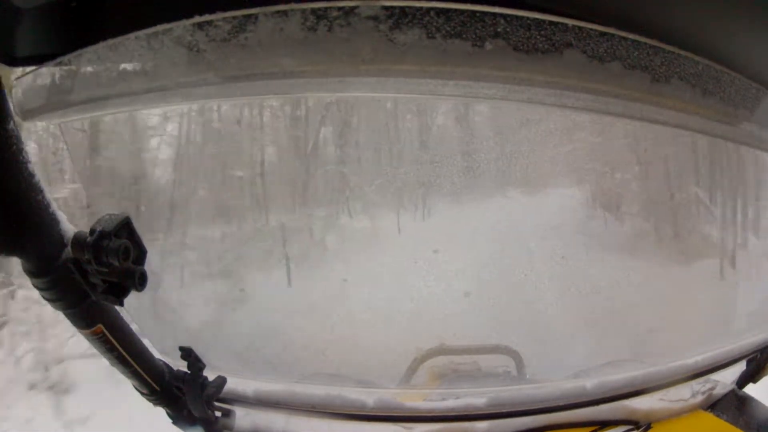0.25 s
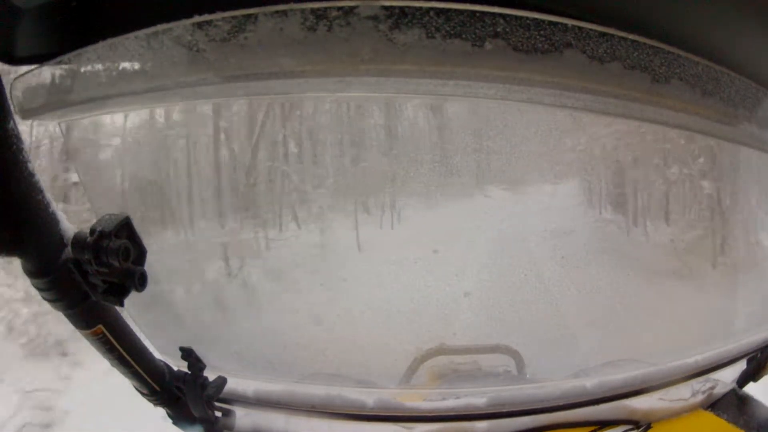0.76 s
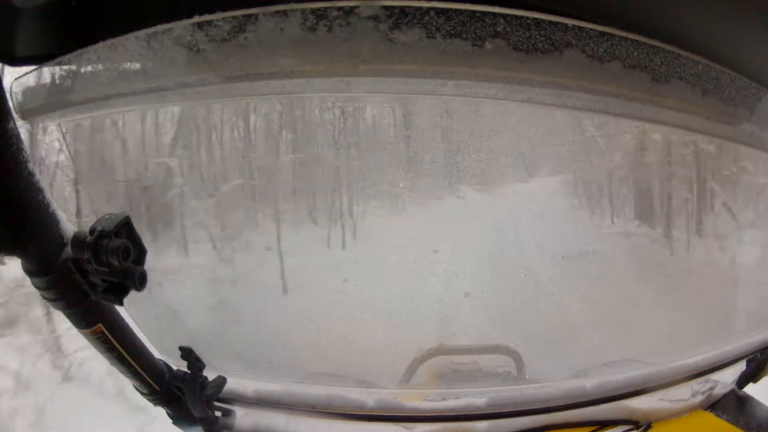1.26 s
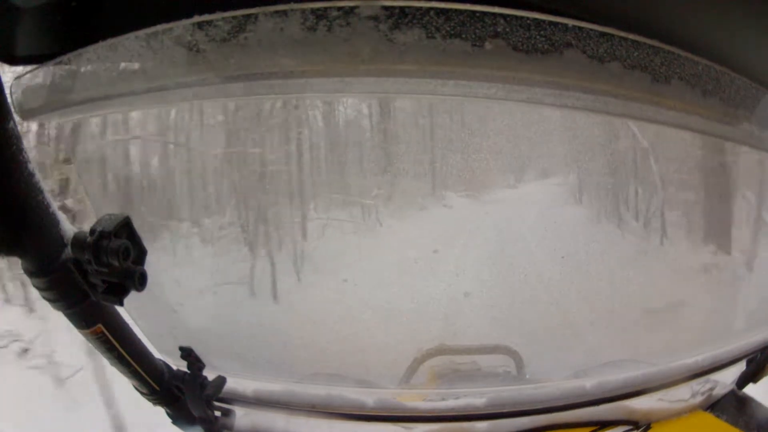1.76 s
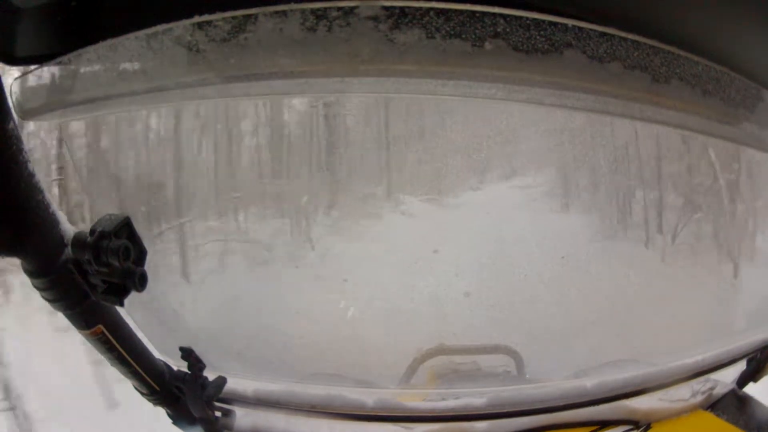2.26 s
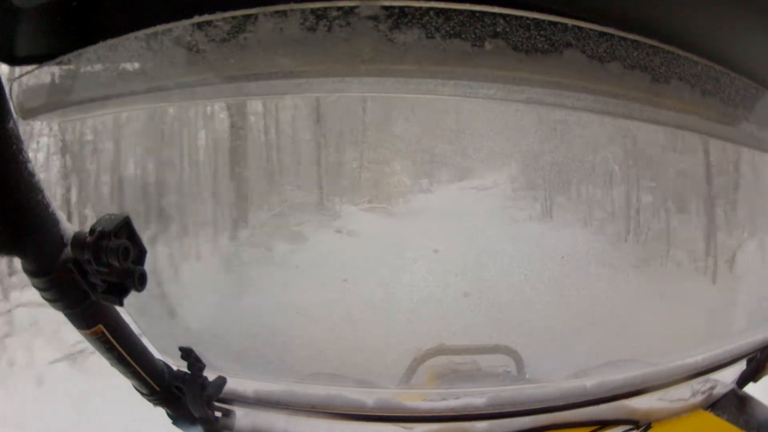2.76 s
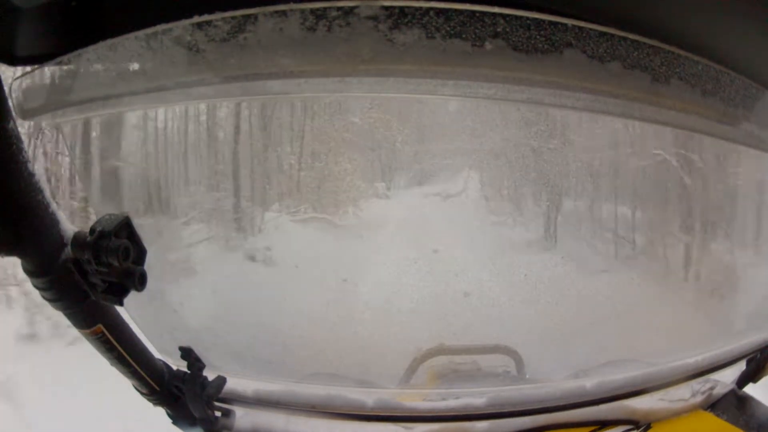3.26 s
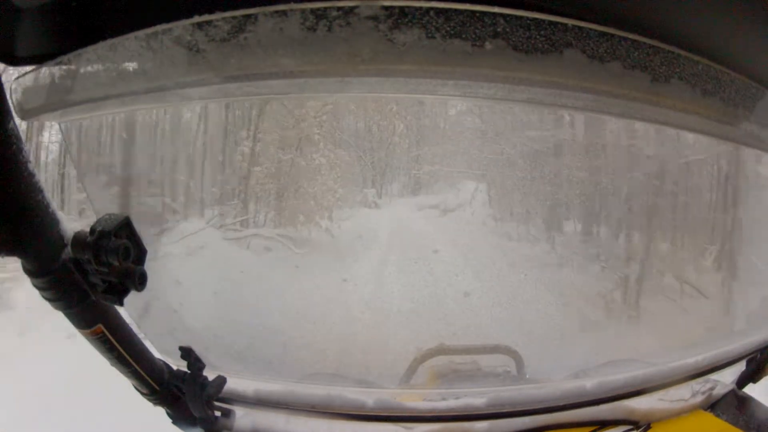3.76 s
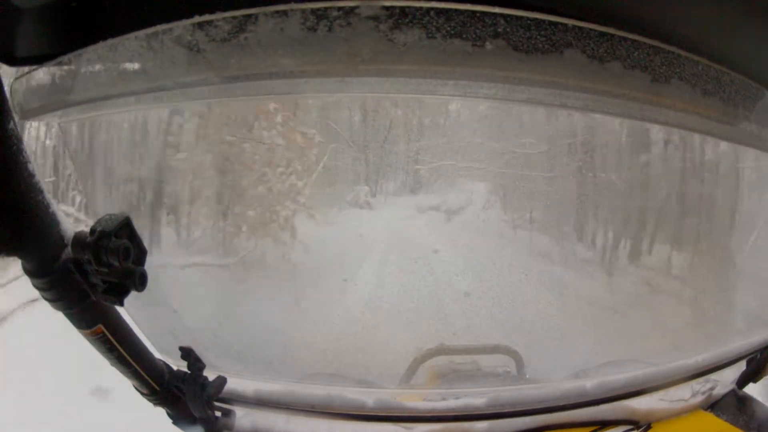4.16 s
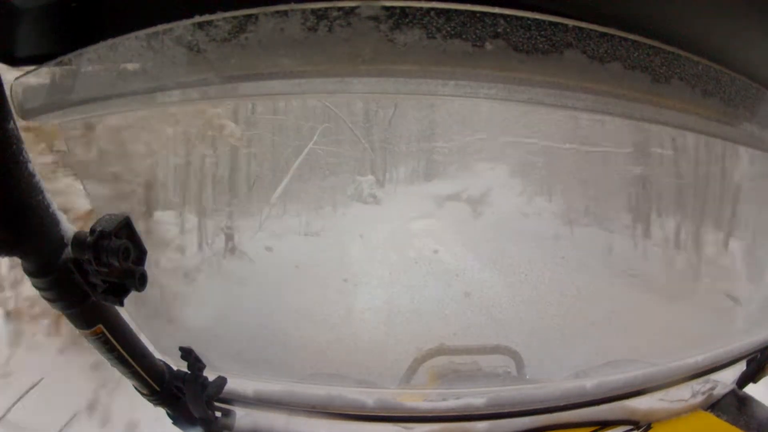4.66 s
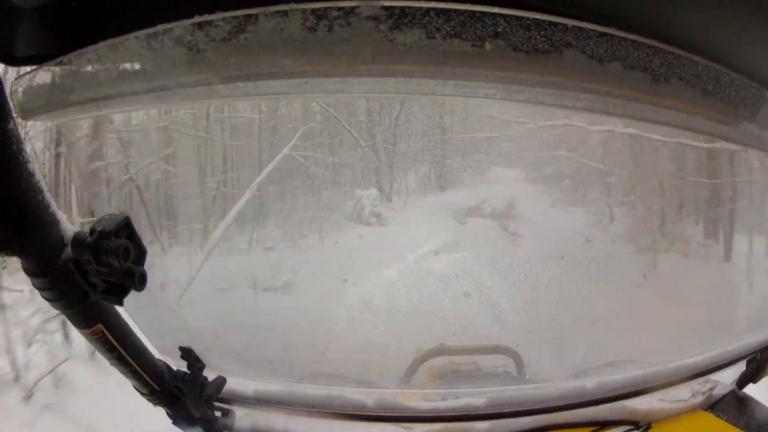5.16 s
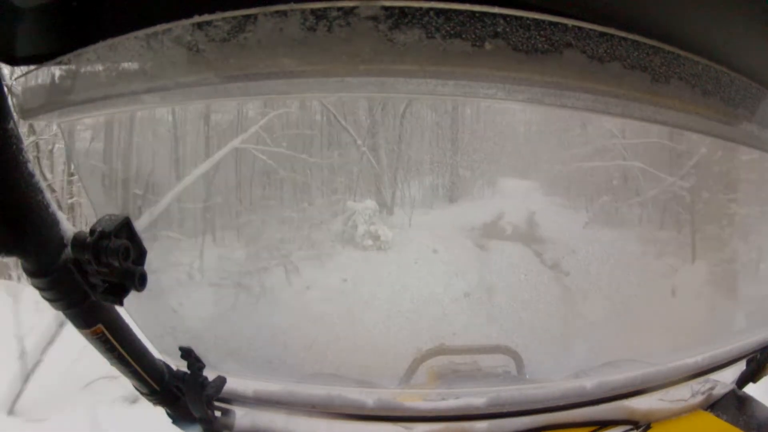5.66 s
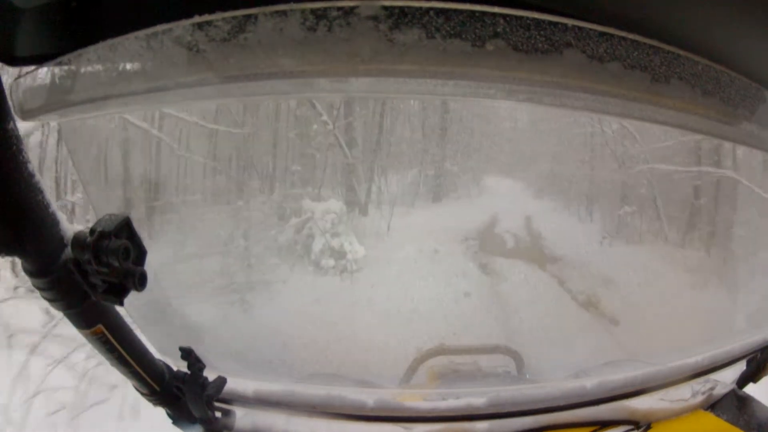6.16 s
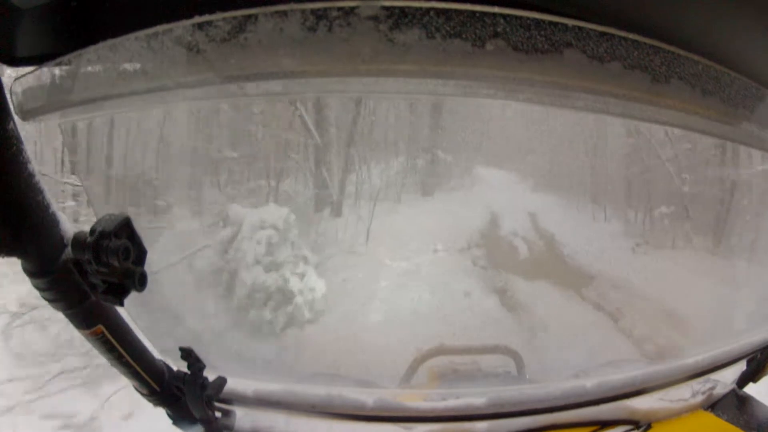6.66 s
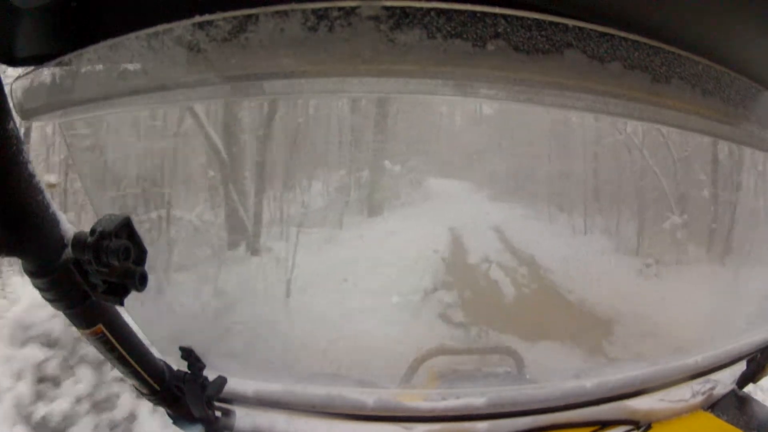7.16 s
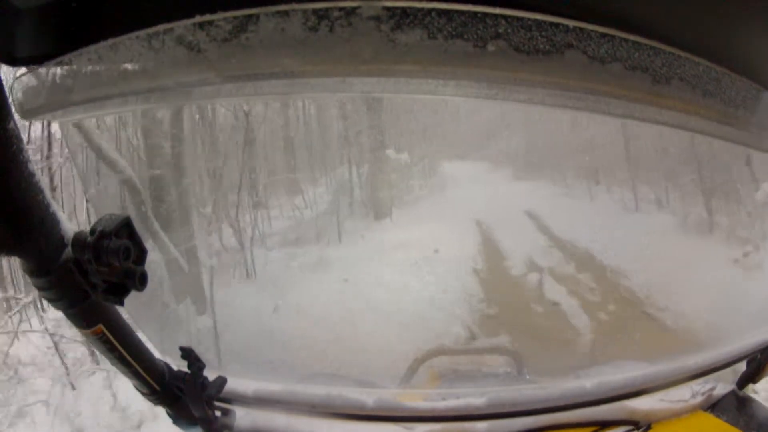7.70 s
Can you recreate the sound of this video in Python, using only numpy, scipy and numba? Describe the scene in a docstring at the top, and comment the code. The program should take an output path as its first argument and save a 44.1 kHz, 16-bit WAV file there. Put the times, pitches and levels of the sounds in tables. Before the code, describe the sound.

An off-road vehicle's engine pulls and then drops to a low boom, with tyre rumble, sharp body knocks and a rattling panel.

```python
"""A twin engine, heard in the cab of a side-by-side on a snowy trail. It pulls, then drops back
until its firing rate meets the cab's boom resonance and shakes a loose panel. Tyres hum and
rumble, snow sprays the underside, the drive belt hisses near top speed and the body knocks
over bumps. A limiter ducks after each hard knock."""
import sys
import numpy as np
from scipy import signal
from scipy.fft import rfft, irfft
from scipy.io import wavfile
from scipy.ndimage import uniform_filter1d, minimum_filter1d, map_coordinates
from numba import njit

SR = 44100
rng = np.random.default_rng(int(sys.argv[2]) if len(sys.argv) > 2 else 0)


def int16_out(signal):
    """Quantize to a 16-bit WAV file."""
    q = np.round(np.clip(np.atleast_2d(signal).T, -1, 1) * 32767)
    wavfile.write(sys.argv[1], SR, q.astype(np.int16))


N = 349713
T = np.arange(N) / SR

# Levels in all tables are relative.
# Road speed. Each row: time in seconds, tyre lug strike rate in Hz.
LUG_RATE_HZ = [(0, 85.2), (.6, 84), (.85, 87.5), (1.08, 86.9), (1.22, 91.8), (1.53, 92.3), (1.8, 96.8),
               (2.07, 94.8), (2.35, 100.7), (2.62, 98.6), (2.95, 102.5), (3.1, 105.8), (3.25, 104.4),
               (3.4, 108), (3.75, 111.8), (3.92, 110.7), (4.2, 113), (4.4, 111.5), (4.72, 100.5),
               (4.88, 98.5), (5.05, 93.3), (5.45, 87.5), (5.6, 82.5), (6.3, 76), (6.7, 71), (7.93, 63)]
# Cab response to the lug harmonics. Each row: frequency in Hz, gain in dB.
LUG_RESPONSE_DB = [(150, -24), (200, -15), (230, -23), (250, -15), (275, 0), (300, 1), (335, -3), (355, -8),
                   (378, -6), (410, -15), (450, -19), (500, -19.5), (565, -23.5), (640, -38)]
# Tyre hum, swelling where the lugs bite. Each row: time in seconds, level in dB.
HUM_LEVEL_DB = [(0, -19), (.6, -15), (1.05, -21.5), (1.22, -15.5), (1.9, -13), (2.4, -16.5), (2.7, -21.5),
                (3.2, -14), (3.9, -14), (4.3, -19), (4.55, -19.5), (4.85, -23.5), (5.03, -15.5), (5.2, -33),
                (5.38, -30), (5.6, -8), (5.9, -39), (6.4, -26), (7.93, -25.5)]
# Tyre and chassis rumble. Each row: frequency in Hz, spectral density in dB.
RUMBLE_SPECTRUM_DB = [(15, -36), (35, -19), (51, 1.5), (65, -15), (110, -21), (150, -23), (185, -16),
                      (240, -21), (305, -5), (335, -6), (370, -13), (420, -25), (540, -28), (650, -34),
                      (2000, -60)]
# Snow spray. Each row: time in seconds, level in dB.
SPRAY_LEVEL_DB = [(2.48, -75), (2.55, -40), (2.9, -38), (3.05, -65), (4.3, -48), (4.55, -32), (4.75, -59),
                  (5.05, -61), (5.11, -28.5), (5.35, -46), (5.7, -29.5), (5.95, -26.5), (6.3, -69),
                  (6.65, -54), (6.78, -41), (6.9, -62)]
# Underside rung by snow. Each row: frequency in Hz, spectral density in dB.
SPRAY_SPECTRUM_DB = [(1200, -11.5), (1700, 4), (2000, 9.5), (2300, 0.5), (2750, -13), (3400, 0),
                     (4000, -21), (4450, 0), (4800, -26), (5100, -4.5), (6000, -31)]
# Belt hiss. Each row: start and end in seconds, centre and resonator width in Hz, level in dB.
BELT_HISS_BANDS = [(3.05, 4.33, 2130, 200, -34), (3.05, 3.47, 4350, 380, -49), (3.05, 3.47, 5050, 400, -47),
                   (3.47, 4.3, 3300, 1000, -40), (3.47, 4.3, 3890, 280, -43), (3.47, 4.3, 4400, 450, -51),
                   (3.47, 4.3, 5050, 400, -52)]
# Wheel thuds. Each row: start in seconds, level in dB.
WHEEL_THUDS = [(1.548, -7), (1.825, -11), (1.968, -9)]
# Hard knocks. Each row: start in seconds, ring and crack levels in dB, note in Hz,
# contact half-width in seconds.
HARD_KNOCKS = [(.22, -8.5, -24, 1945, 0.0031), (.312, -16, -33, 1750, 0.02),
               (.452, -12.5, -28, 1820, 0.017), (.625, 5, -5.5, 1660, 0.0011), (.77, -11, -24, 2000, 0.012),
               (.854, -9.5, -28, 1780, 0.0074), (1.122, -13, -27, 1760, 0.018),
               (2.119, -12, -33, 1700, 0.049), (2.534, -11, -20.5, 2000, 0.035),
               (2.619, -7.5, -13, 1660, 0.0046), (2.685, -14.5, -34, 1950, 0.011),
               (2.742, -16, -21.5, 2000, 0.034), (2.783, -12, -19.5, 1960, 0.025),
               (3.5134, -2, 4.5, 1850, 0.0022), (4.1, 2, -10, 1840, 0.0017),
               (4.293, 1.5, -14, 1670, 0.0011), (4.373, -13, -17, 1840, 0.017),
               (4.388, -13, -16.5, 1820, 0.015), (4.402, -18, -18, 1770, 0.016),
               (4.455, 6.5, -3, 1810, 0.0013), (4.533, -9, -14.5, 2080, 0.014),
               (4.622, -16, -18, 1860, 0.015), (4.688, -19, -27, 1770, 0.0013),
               (4.701, 7, -28, 1735, 0.0013), (4.847, 6.5, -23.5, 1864, 0.0021),
               (4.939, -2.5, -15, 2150, 0.011), (4.953, -5, -20, 1850, 0.0059),
               (5.085, 2.5, -6.5, 1790, 0.0048), (5.233, -12.5, -18, 1800, 0.022),
               (5.303, -10, -29, 1840, .007), (5.626, 1, -7, 1530, 0.0062), (5.714, -3, -12, 1950, .007),
               (5.785, -9.5, -30, 1880, 0.021), (5.826, -13, 8.5, 2160, 0.0012),
               (5.854, -24, -1.5, 2200, 0.0039), (5.873, -24, -10.5, 2200, .01),
               (6.76, -12, -25, 1560, .008), (6.8, -9.5, -33, 1860, 0.0048), (7.135, -5, -13, 1800, 0.0051),
               (7.168, -12, -22, 1860, 0.0035), (7.188, -11, -29, 1870, 0.0085),
               (7.208, 1.5, -15, 1860, .003), (7.228, -11, -26, 1800, .005),
               (7.265, -3.5, -19, 1810, 0.002), (7.427, -2.5, -15.5, 1830, 0.0016)]
# Body panel response. Each row: frequency in Hz, gain in dB.
BODY_RESPONSE_DB = [(300, -39), (900, -14.5), (1350, -5), (1600, -2), (1830, 0), (2150, -8), (2700, -55),
                    (3500, -15), (4300, -70), (6000, -49)]
# Body panel modes. Each row: frequency in Hz, width in Hz, gain in dB.
BODY_MODES = [(1789, 42, 7.5), (1883, 23.5, 9.5), (2003, 24, 5)]
# Crack of hard contact. Each row: frequency in Hz, spectral density in dB.
CRACK_SPECTRUM_DB = [(300, -2.5), (900, -16.5), (1700, -6.5), (2250, 1.5), (2750, -8.5), (3500, 2.5),
                     (4000, -14), (4450, -5), (4850, -14.5), (5300, -14.5), (6500, -17)]
# Loose panel buzz. Each row: time in seconds, tap level in dB.
BUZZ_LEVEL_DB = [(5.2, -41), (5.9, -49), (6.15, -17.5), (6.45, -19), (6.7, -24), (7.03, -22), (7.25, -16),
                 (7.5, -14.5), (7.93, -19)]
# Loose panel's hardest slaps. Each row: start in seconds, level in dB.
PANEL_SLAPS = [(6.304, -14.5), (6.325, -11.5), (6.405, -18), (6.443, -16), (6.462, -21), (6.483, -24),
               (6.5639, -6.5), (6.9576, -11), (7.369, -7.5), (7.392, -13), (7.5095, -6), (7.5691, -12),
               (7.629, -10), (7.652, -5.5), (7.712, -9.5), (7.7496, -11.5), (7.772, -3), (7.829, -6),
               (7.85, -3), (7.867, -7), (7.887, -6.5)]
# Loose panel edge. Each row: frequency in Hz, spectral density in dB.
EDGE_SPECTRUM_DB = [(400, -45), (1200, -17), (1800, 10), (2600, -10), (3400, -3), (4300, -17.5),
                    (6000, -24)]
# Engine speed. Each row: time in seconds, four-stroke cycle rate in Hz (two firings a cycle).
CYCLE_RATE_HZ = [(0, 30.55), (.6, 30.6), (.85, 32.6), (1.05, 33.1), (1.2, 34.9), (1.85, 35.85),
                 (2.05, 35.3), (2.7, 35.9), (3.45, 37.85), (3.9, 37.05), (4.42, 35.7), (4.64, 30),
                 (4.9, 29.4), (5.3, 27.2), (5.45, 27.7), (5.7, 25.4), (6.3, 24.85), (6.95, 25.7),
                 (7.6, 24.9), (7.93, 25.45)]
# Engine load. Each row: time in seconds, exhaust level in dB, clatter level in dB.
LOAD_LEVELS_DB = [(0, -20, -32), (.8, -19.5, -28.5), (1.35, -13.5, -27.5), (2.1, -19.5, -31),
                  (2.35, -12.5, -28), (2.65, -18.5, -30), (3.35, -14, -25), (3.7, -16.5, -26.5),
                  (4.3, -18.5, -28.5), (4.55, -28, -34.5), (4.75, -17.5, -32), (5, -14.5, -28),
                  (5.38, -25, -38.5), (5.6, -18.5, -25), (5.9, -32, -42), (6.4, -23.5, -34),
                  (7.93, -21.5, -37)]
# Engine casing and belt housing. Each row: frequency in Hz, spectral density in dB.
CASING_SPECTRUM_DB = [(400, -2.5), (650, -7), (900, -33), (1060, 9), (1350, -2.5), (1750, 4.5),
                      (2150, -2.5), (2700, -38.5), (3300, -9.5), (3650, -19), (4050, -34.5), (4450, -23),
                      (4750, -45), (5100, -24), (6000, -57.5)]
# Casing modes. Each row: frequency in Hz, width in Hz, gain in dB.
CASING_RESONANCES = [(807.4, 39, -1), (1006.2, 15.4, 11.5), (2353, 44, -11)]
# Exhaust harmonics. Each row: multiple of the cycle rate, level in dB.
EXHAUST_ORDERS = [(1, 2.5), (3, 2.5), (4, 3.5), (5, -3), (6, -0.5), (7, -6.5), (8, -2.5), (9, -1.5),
                  (10, -4), (11, -7), (12, -1)]
# Cab response to the exhaust. Each row: frequency in Hz, gain in dB.
CAB_RESPONSE_DB = [(25, -17), (36, -7), (85, -8), (110, -3), (130, 0.5), (140, -12), (150, -13), (178, -3),
                   (205, -9), (240, -11), (285, 2), (308, -2), (336, 3), (385, -5), (412, -13), (490, -19),
                   (570, -24), (700, -38)]
# Firing boom, loudest at the cab's resonance. Each row: time in seconds, level in dB.
BOOM_LEVEL_DB = [(0, -17.5), (.8, -24), (1.6, -26.5), (2.4, -24.5), (4.3, -22.5), (4.62, -27),
                 (4.69, -14.5), (4.76, -21), (5.17, -21), (5.26, -12.5), (5.39, -16), (5.5, -10),
                 (5.72, -12.5), (5.93, -20.5), (6.12, -10.5), (7.93, -12.5)]


def undb(db):
    """Decibels to gain."""
    return 10 ** (np.asarray(db) / 20)


def unit(x):
    """Scale to an rms of 1."""
    return x / np.sqrt(np.mean(x ** 2))


def curves(table):
    """Each value column interpolated over time."""
    times_s, *columns = np.transpose(table)
    return [np.interp(T, times_s, column) for column in columns]


def gain_at(hz, spectrum):
    """Gain of a (Hz, dB) spectrum, falling steeply past its top end."""
    points_hz, db = np.transpose(spectrum)
    return undb(np.interp(np.log(hz + 1), np.log(points_hz), db)) / (1 + (hz / points_hz[-1] / 2) ** 6)


def colour(x, spectrum, size=16384):
    """Minimum-phase filter with the given spectrum."""
    cepstrum = irfft(np.log(gain_at(np.arange(size // 2 + 1) * SR / size, spectrum)))
    cepstrum[1:size // 2] *= 2
    cepstrum[size // 2 + 1:] = 0
    return signal.fftconvolve(x, irfft(np.exp(rfft(cepstrum))))[:len(x)]


def ring(x, hz, width_hz):
    """One resonance."""
    return signal.lfilter(*signal.iirpeak(hz, hz / width_hz, fs=SR), x)


def muffle(x, hz):
    """Steep low-pass."""
    return signal.sosfilt(signal.butter(6, hz, fs=SR, output="sos"), x)


def walk(rate_hz):
    """Smooth random curve, spread near 1."""
    return 1.2 * map_coordinates(rng.standard_normal(4096), [T * rate_hz], order=2, mode="wrap")


def noise():
    """White noise."""
    return rng.standard_normal(N)


def add(track, start_s, sound):
    """Mix a sound into a track."""
    part = track[int(start_s * SR):][:len(sound)]
    part += sound[:len(part)]


def tyre_tone(lug_hz, order):
    """One multiple of the lug rate; unequal wheel speeds make it swell and wander."""
    lug_cycles = np.cumsum(lug_hz) / SR
    phase = 2 * np.pi * (order * lug_cycles + rng.random()) + .2 * walk(10)
    swell = 1 + .18 * walk(14) + .08 * walk(80)
    return gain_at(order * lug_hz, LUG_RESPONSE_DB) * np.sin(phase) * swell


def tyres(hum_db=2.5, rumble_db=-23, sway_db=2.5):
    """Lugs drum a hum and a drive gear sings; gear and chassis rumble fade as the vehicle slows."""
    lug_hz, = curves(LUG_RATE_HZ)
    slowing = np.interp(T, [4.6, 5.7], [0, 1])
    hum = sum(tyre_tone(lug_hz, order) for order in (2, 3, 4, 5))
    gear = tyre_tone(lug_hz, order=3.7) * undb(-.5 - 9 * slowing)
    rumble = unit(colour(noise(), RUMBLE_SPECTRUM_DB))
    rumble *= undb(rumble_db - 4 * slowing + sway_db * walk(8.5))
    return (hum + gear) * undb(curves(HUM_LEVEL_DB)[0] + hum_db) + rumble


def snow_spray(grain_db=3.5, patch_db=4):
    """Wheels throw patches of gritty snow at the underside, which rings."""
    grit = noise() * undb(grain_db * walk(400) + patch_db * walk(30))
    return unit(colour(grit, SPRAY_SPECTRUM_DB)) * undb(curves(SPRAY_LEVEL_DB)[0])


def belt(gain_db=1, flutter_db=1, fade_s=.013):
    """Near top speed the drive belt hisses in narrow bands, then jumps to another set."""
    flutter = undb(gain_db + flutter_db * walk(25.2))
    hiss = np.zeros(N)
    for start_s, end_s, hz, width_hz, db in BELT_HISS_BANDS:
        gate = np.clip(np.minimum(T - start_s, end_s - T) / fade_s + .5, 0, 1)
        band = noise()
        for _ in range(3):
            band = ring(band, hz, width_hz)
        hiss += undb(db) * gate * unit(band)
    return hiss * flutter


def wheel_thuds(hz=450, decay_s=.0012):
    """A wheel strikes something under the snow: a short, dull blow."""
    track, age_s = np.zeros(N), T[:SR // 20]
    blow = np.sin(2 * np.pi * hz * age_s) * np.exp(-age_s / decay_s)
    for start_s, db in WHEEL_THUDS:
        add(track, start_s, undb(db) * blow)
    return track


def small_knocks(rate_hz=2, note_hz=1940, note_scatter=.039, spread_db=.5, contact_s=.019):
    """Light knocks at random times, as rows like HARD_KNOCKS."""
    gap, strength, tuning = rng.random((64, 3)).T
    starts_s = np.cumsum(.3 + 1.4 * gap) / rate_hz
    offsets_db = spread_db * (2 * strength - 1)
    notes_hz = note_hz * (1 + note_scatter * (2 * tuning - 1))
    return [(start_s, db - 16.5, db - 29.5, hz, contact_s)
            for start_s, db, hz in zip(starts_s, offsets_db, notes_hz)]


def body_knocks(rise_s=.0017, blow_s=.0017, tail_s=.01, tail_db=-22, grit_db=2):
    """Over bumps, panels chatter on the frame and ring, each knock on its note; contact adds a crack."""
    chatter, notes, crack_envelope = np.zeros((3, N))
    age_s = T[:SR // 5]
    blow = np.exp(-((age_s - rise_s) / blow_s) ** 2)
    tail = undb(tail_db) * np.exp(-age_s / tail_s)
    for start_s, ring_db, crack_db, hz, contact_s in list(HARD_KNOCKS) + small_knocks():
        contact = np.exp(-((age_s - rise_s) / contact_s) ** 2)
        add(chatter, start_s, undb(ring_db - 6) * (contact + tail))
        add(notes, start_s, undb(ring_db - 16) * blow * np.sin(2 * np.pi * hz * age_s))
        add(crack_envelope, start_s, undb(crack_db) * contact)
    force = notes + chatter * noise()
    modes = sum(undb(db) * ring(force, hz, width_hz) for hz, width_hz, db in BODY_MODES)
    body = colour(force, BODY_RESPONSE_DB) + muffle(modes, hz=2500)
    scrape = unit(noise() * undb(grit_db * walk(700)))
    crack = colour(crack_envelope * scrape, CRACK_SPECTRUM_DB)
    return undb(8.5) * body + undb(3.5) * crack


def loose_panel(cycles, decay_swings=.12, scatter_db=5, rub_db=-22, slap_s=.00068):
    """A panel edge taps its frame on each boom downswing, rubs in between and at times slaps hard."""
    swings = 2 * cycles + .5 + .02 * walk(37)  # half a swing late, with jitter
    strengths = undb(scatter_db * np.clip(rng.standard_normal(1024), -2, 1.5))
    taps = strengths[swings.astype(int)] * (np.exp(-(swings % 1) / decay_swings) + undb(rub_db))
    cluster_db = -walk(39)
    contact = taps * undb(curves(BUZZ_LEVEL_DB)[0] + 4 + cluster_db)
    slap = np.exp(-T[:SR // 40] / slap_s)
    for start_s, db in PANEL_SLAPS:
        add(contact, start_s, undb(db + 11) * slap)
    return colour(noise() * contact, EDGE_SPECTRUM_DB)


def clatter(cycles, decay_firings=.99, floor=.94, flicker_db=1.17):
    """Valves and belt rasp in step with the firings and ring the casing."""
    pulses = floor + np.exp(-(2 * cycles % 1) / decay_firings)
    rasp = noise() * pulses * undb(flicker_db * walk(60))
    modes = sum(undb(db) * ring(rasp, hz, width_hz) for hz, width_hz, db in CASING_RESONANCES)
    return unit(colour(rasp, CASING_SPECTRUM_DB)) + undb(-3) * unit(muffle(modes, hz=2700))


def exhaust(cycle_hz, cycles):
    """Harmonics slide through cab resonances; no two cycles burn alike, and gas puffs at each firing."""
    tone = np.zeros(N)
    burn, jitter_rad = .15 * walk(45), .012 * walk(35)
    for order, db in EXHAUST_ORDERS:
        phase = 2 * np.pi * (order * cycles + rng.random()) + order * jitter_rad
        strength = 1 + burn + .1 * walk(10)
        tone += undb(db) * gain_at(order * cycle_hz, CAB_RESPONSE_DB) * np.sin(phase) * strength
    puffs = noise() * (1 + .5 * np.cos(4 * np.pi * cycles))
    gas = unit(colour(puffs, CAB_RESPONSE_DB))
    gas_share = np.interp(T, [4.3, 4.8], [.02, .12])  # off throttle the note breaks up
    return unit(tone) * np.sqrt(1 - gas_share) + gas * np.sqrt(gas_share)


def boom(cycles, second_db=-21, imbalance_db=-24):
    """Firings pump the cab air, a near-pure tone; unequal cylinders add a line at 1.5 times its rate."""
    firing_phase = 4 * np.pi * cycles
    second = undb(second_db) * np.cos(2 * firing_phase)
    imbalance = undb(imbalance_db) * np.sin(1.5 * firing_phase)
    return unit(np.sin(firing_phase) + second + imbalance)


def engine(cycle_hz, cycles):
    """Four-stroke twin: cab boom, plus exhaust and clatter that follow the load."""
    boom_db, = curves(BOOM_LEVEL_DB)
    exhaust_db, clatter_db = curves(LOAD_LEVELS_DB)
    return (boom(cycles) * undb(boom_db + 4)
            + exhaust(cycle_hz, cycles) * undb(exhaust_db)
            + clatter(cycles) * undb(clatter_db + 4.5))


def scene():
    """Engine, running gear and body, heard from the seat in mono."""
    cycle_hz, = curves(CYCLE_RATE_HZ)
    cycles = np.cumsum(cycle_hz) / SR
    machinery = engine(cycle_hz, cycles) + belt() + loose_panel(cycles)
    trail = tyres() + snow_spray() + body_knocks() + wheel_thuds()
    return (machinery + trail)[None]


@njit
def hold_peaks(x, ceiling, release):
    """Peak follower: instant attack, slow release, never below the ceiling."""
    envelope, peak = np.empty(len(x)), ceiling
    for i in range(len(x)):
        peak = max(x[i], peak * release, ceiling)
        envelope[i] = peak
    return envelope


def limiter(x, ceiling=.76, release_s=.23, window_samples=64):
    """Duck just ahead of each peak, then recover."""
    gain = ceiling / hold_peaks(np.abs(x), ceiling, np.exp(-1 / (release_s * SR)))
    return x * uniform_filter1d(minimum_filter1d(gain, window_samples), window_samples)


def record(dry, full_scale=.69, hold_hz=12000, top_hz=14500):
    """Limit and round the peaks; sample-and-hold images around hold_hz add a thin sizzle."""
    limited = limiter(dry[0])
    rounded = limited / (1 + (limited / full_scale) ** 6) ** (1 / 6)
    baseband = muffle(rounded, hold_hz / 2)
    images = np.diff(baseband, prepend=0) * 2 * np.cos(2 * np.pi * hold_hz * T)
    sizzle = signal.lfilter([.85], [1, -.9], images)
    low_pass = signal.ellip(8, .2, 70, top_hz, fs=SR, output="sos")
    return signal.sosfilt(low_pass, baseband + sizzle)[None]


dry = scene()
out = record(dry)
int16_out(out)
```